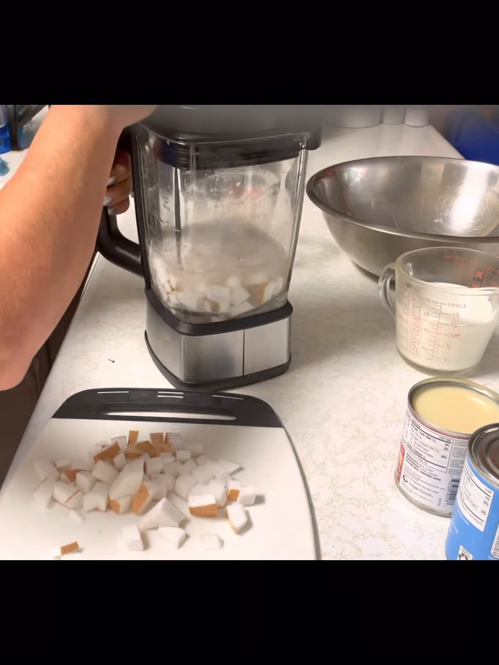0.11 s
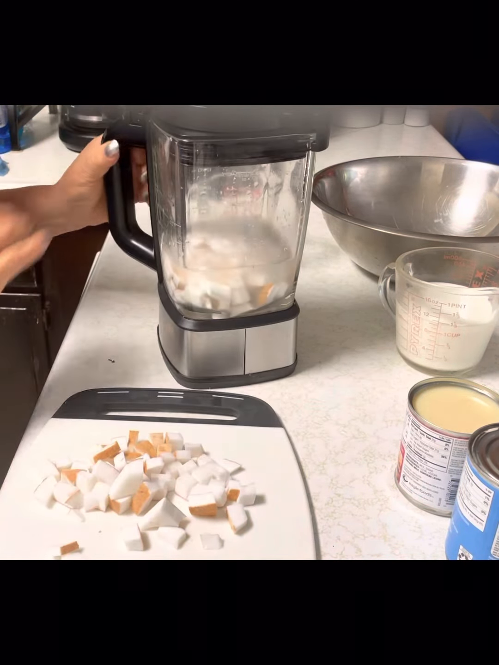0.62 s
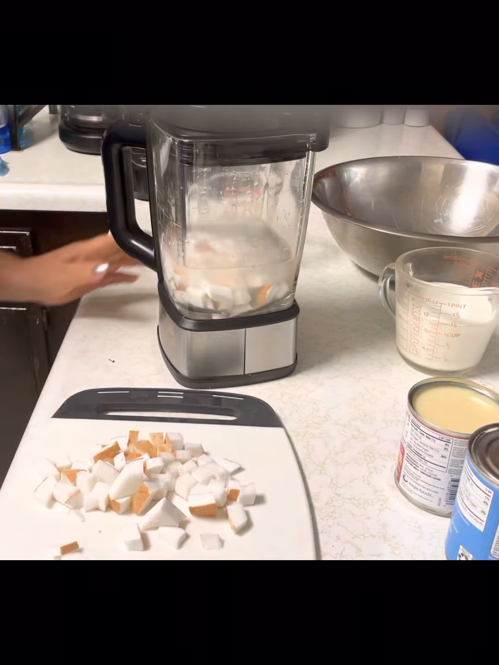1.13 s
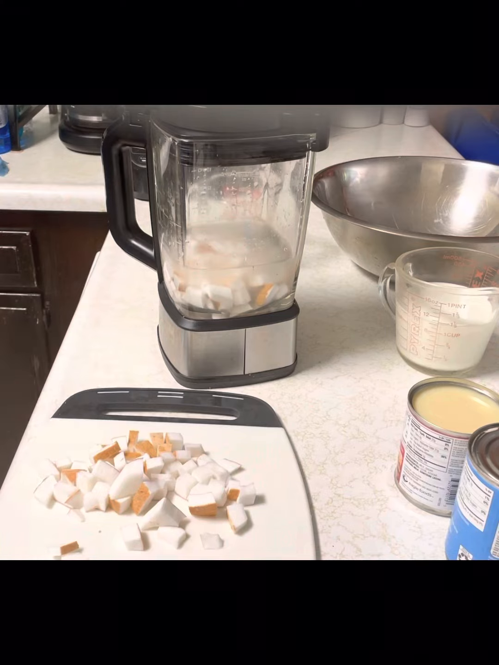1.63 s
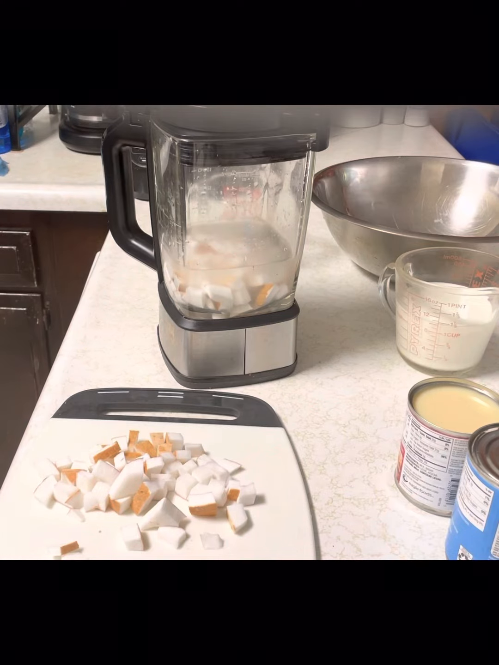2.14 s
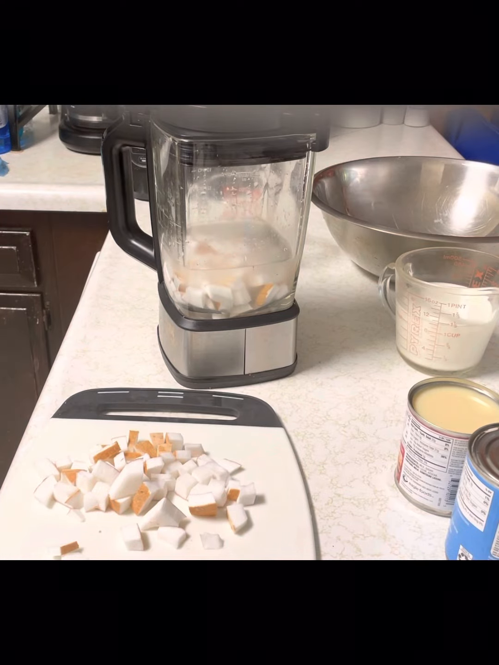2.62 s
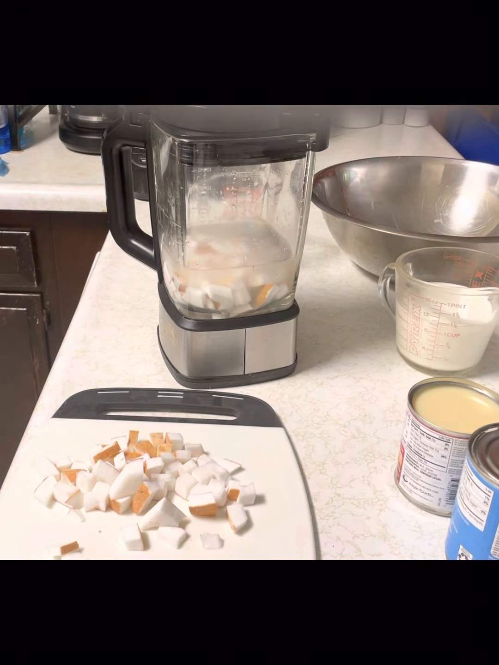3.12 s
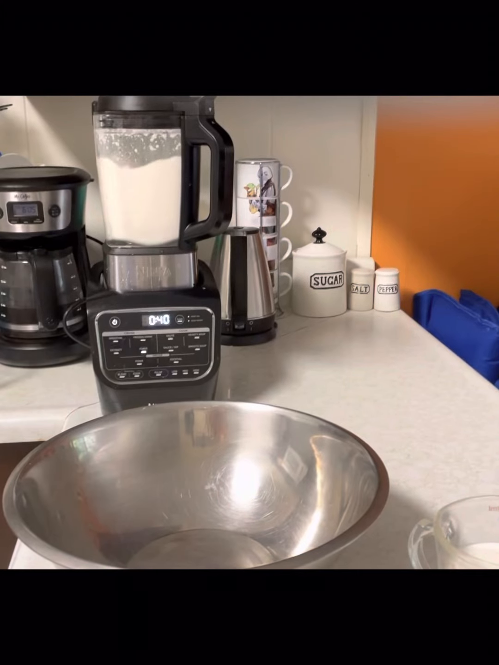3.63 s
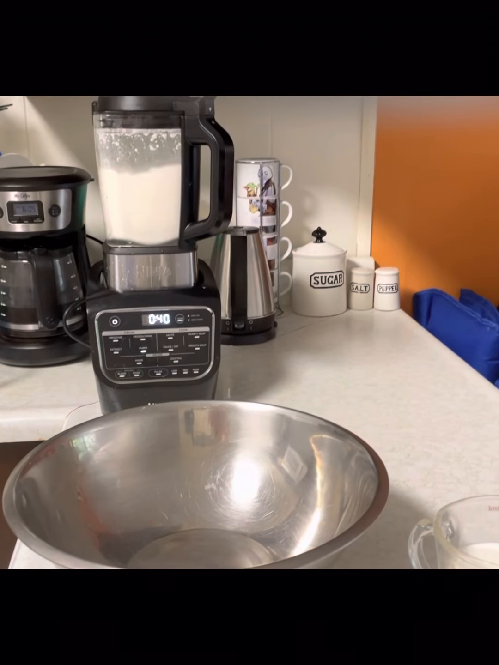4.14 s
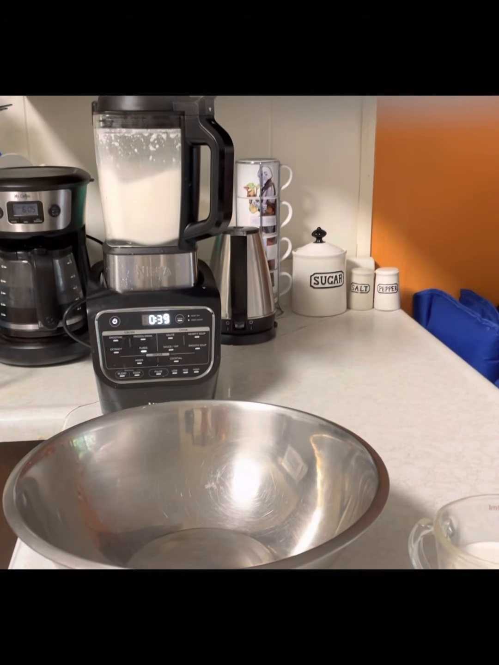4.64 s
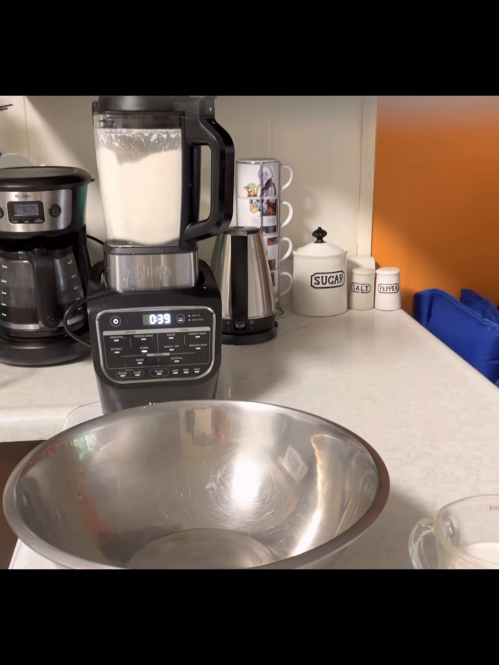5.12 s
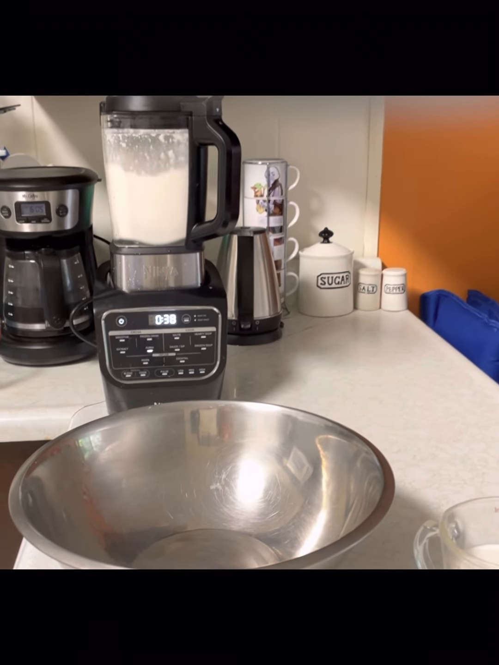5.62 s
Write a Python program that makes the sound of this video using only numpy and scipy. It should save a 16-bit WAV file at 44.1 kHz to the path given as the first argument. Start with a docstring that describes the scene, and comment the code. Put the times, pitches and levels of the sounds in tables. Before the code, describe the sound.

A jar is set on a kitchen counter with a thump, light knocks and creaks follow, then a loud blender abruptly cuts in and runs steadily.

```python
"""A quiet kitchen: a hand knocks, brushes, raps and ticks a blender jar on the counter; its lid creaks.
Knocks ring damped modes, brushing and rattly tails are banded noise, over a low rumble and mains hum.
After an instant of silence the scene cuts to the blender already running: wavering shaft orders and throb.
Chopped food churns as noise that rings the jar, under a bright hiss; falling food makes the shaft sag.
Two microphone ports hear it all, the knocks, ticks and squeak with echoes of a small hard room."""
import sys
import numpy as np
from scipy import signal
from scipy.fft import rfft, irfft
from scipy.io import wavfile
from scipy.ndimage import uniform_filter1d

SR = 44100
rng = np.random.default_rng(int(sys.argv[2]) if len(sys.argv) > 2 else 0)


def output_pcm(signal):
    """Save a mono or channel-first signal as 16-bit PCM at the path in sys.argv[1].

    Samples are clipped to [-1, 1] before scaling.
    """
    pcm = np.clip(np.atleast_2d(signal).T, -1, 1) * 32767
    wavfile.write(sys.argv[1], SR, np.round(pcm).astype(np.int16))


def volts_from_decibels(level):
    """Turn decibel levels (scalar or array-like) into linear amplitude factors."""
    exponent = np.asarray(level, float) / 20
    return 10 ** exponent


N = 254016

# Wavering, roughened motor lines: (shaft multiple, mains-throb multiple, level [dB rms], waver [dB])
MOTOR_ORDERS = [(1, 0, -25, 2.5), (3, 0, -27.5, 1.5), (5, 0, -34.5, 3.5), (6, 0, -46.5, 6.5),
                (7, 0, -41, 5.5), (12, 0, -38.5, 2), (0, 1, -37, -3.5), (0, 2, -29, 3.5), (1, -1, -44, 3),
                (1, 1, -32.5, 0), (3, -1, -41, 6), (4, 1, -28, -0.5)]
# The whirl of food falls back on the blades: (time [s], churn swell [dB], shaft slowing [turns/s])
GULPS = [(3.432, 2, 3.98), (3.859, 2, 5.9), (4.181, 1, 4.97), (4.452, 2.5, 6.9), (4.71, 2.5, 7.2),
         (5.048, 2.5, 7.956), (5.302, 2, 8.5), (5.591, 3.5, 8.75)]
# Relative colour of the churning food: (frequency [Hz], density [dB per Hz])
CHURN_COLOUR = [(18, -52), (30, -44), (127, -24.5), (175, -6), (379, -11.5), (530, -2), (589, -9),
                (824, -2), (995, -18), (1200, -12), (1480, -15), (2160, -17), (4500, -30), (5850, -31),
                (9900, -120)]
# Jar and base ringing under the churn: (frequency [Hz], width [Hz], gain over the churn [dB])
JAR_MODES = [(85.6, 10, 20), (260, 130, 6.5), (345.8, 5.9, 14.5), (448, 42, 6), (530, 87, -9),
             (800, 290, 2.5), (886, 25, 1.5), (1200, 50, 5), (1649, 20.5, 10.5), (2230, 30, 6),
             (2170, 60, 1.5), (2686, 310, 4.5)]
# Relative colour of cooling air and fine spray: (frequency [Hz], density [dB per Hz])
HISS_COLOUR = [(1500, -2), (3500, -23), (5700, -38), (6100, 3), (6600, -4.5), (8500, -4), (10500, -4),
               (12700, -5), (13000, -14), (13300, 3.5), (16000, -16.5)]
# The jar bumps the counter: (time [s], crack [dB], thud [dB], body [dB], pitch the struck spot favours [Hz])
THUMPS = [(0.0004, -24, -20.5, -17.5, 248), (1.234, -75, -49.5, -41.5, 160), (1.5693, -67, -55, -51, 143),
          (2.0538, -56, -66, -48, 293), (2.0664, -58, -46, -37.5, 165), (2.1457, -70, -48, -40, 143),
          (2.251, -32, -34, -16.5, 307), (2.621, -68, -56, -50.5, 199)]
# Fingers rap the plastic: (time [s], crack [dB], plastic [dB], body [dB], pitch the struck spot favours [Hz])
RAPS = [(1.6857, -54, -54, -47, 143), (2.2175, -50, -42, -42, 218), (2.2455, -36, -36, -32, 303)]
# The lid creaks in runs of slips: (start [s], slips [count], first gap [s], growth of each gap [s])
CREAKS = [(2.7255, 3, .0205, -.005), (2.8417, 5, .0145, .003), (2.9766, 3, .0217, 0)]
# Loudness of each creak run: (first plastic [dB], body [dB], rise per slip [dB])
CREAK_LEVELS = [(-49, -39, -3), (-41.5, -41.5, 1.5), (-40.5, -39, 1)]
# Modes of counter, jar and lid:
# (frequency [Hz], level [dB], t60 [s], struck by [0 crack, 1 thud, 2 body, 3 plastic])
BODY_MODES = [(80, 0, .3, 1), (58, -6, .3, 1), (160, 0, .1, 2), (225, -2, .08, 2), (330, 0, .06, 2),
              (480, -4, .04, 2), (1150, -8, .02, 0), (1500, -6, .02, 0), (660, -2, .04, 3),
              (760, 0, .04, 3), (890, -1, .035, 3)]
# Rise time of the modes struck by each part: (crack [s], thud [s], body [s], plastic [s])
MODE_RISE = [.001, .008, .003, .0015]
# Relative colour of the crack that opens a blow: (frequency [Hz], density [dB per Hz])
CRACK_COLOUR = [(900, 10), (2300, -4), (3500, -27), (5500, -6), (9000, -11.5), (12000, -40), (16000, -54)]
# Fingernail ticks: (time [s], level [dB], centre [Hz])
TICKS = [(.357, -65, 9000), (.407, -65, 3000), (.566, -60, 2500), (.634, -61, 3200), (.9602, -64, 2600),
         (1.2894, -52, 1800), (1.596, -51, 10000), (1.6857, -50, 1900), (2.2165, -49, 4500),
         (2.244, -32, 4500)]
# A fingertip on plastic: (time [s], length [s], pitch [Hz], level [dB])
SQUEAK = (.608, .06, 1330, -72)
# Brushing strokes and the rattly tails of knocks, one row each:
# (start [s], hold [s], dull [dB], mid [dB], bright [dB])
BRUSHES_AND_RATTLES = [(0.0, 0.027, -47, -46, -47.5), (0.607, 0.15, -81, -84, -92),
                       (.715, 0.044, -71.5, -76, -76), (0.762, 0.056, -73, -64.5, -64.5),
                       (0.864, 0.026, -70, -65, -62.5), (0.955, 0.074, -89, -65, -73),
                       (1.238, 0.064, -72, -71, -70), (1.467, 0.11, -85, -81, -72.5),
                       (1.597, 0.018, -86, -90, -69), (1.685, 0.019, -53, -75, -82),
                       (1.762, .05, -74, -71, -83), (2.059, 0.13, -66, -74, -68.5),
                       (2.244, 0.029, -43, -53, -49.5), (2.62, 0.066, -73, -70.5, -69),
                       (2.744, 0.075, -60, -74, -87), (2.85, 0.091, -54, -65, -62),
                       (2.983, 0.045, -61, -60.5, -57.5), (3.1, .1, -85, -75, -72.5)]
# Faint stirring between the rows above: (dull [dB], mid [dB], bright [dB])
REST_LEVELS = (-77, -82, -106)
# Dull, mid and bright bands of brushing and rattle: (centre [Hz], width [octaves])
BRUSH_BANDS = [(450, 1.67), (2400, 0.63), (8500, 0.76)]
# Jar wall ringing under brushing and rattle: (frequency [Hz], width [Hz], gain [dB])
JAR_WALL = [(2100, 170, 3.5), (2520, 88, 6), (3420, 160, 3.5), (4660, 200, 8.5)]
# Relative colour of the room's rumble and faint hiss: (frequency [Hz], density [dB per Hz])
FLOOR_COLOUR = [(15, -55), (25, -2), (121, -5), (213, -17), (301, -19), (604, -44), (2130, -30),
                (2370, -47), (6370, -40), (7890, -37), (10900, -34.5), (15000, -39)]
# Two microphone ports: (frequency [Hz], likeness [0-1], left leads by [radians], left over right [dB])
PORTS = [(60, .97, .1, .5), (200, .97, .3, .5), (430, .75, .5, 2.5), (600, .65, .7, 0), (700, .85, 1.6, -2),
         (900, .92, 1.7, -1), (1080, .45, .3, 1), (1400, .5, .4, 1), (1700, .8, .3, -1),
         (2700, .8, -.4, -2.5), (4100, .4, 0, -3.5), (6800, .3, 0, -1), (8100, .9, 3, 0),
         (8900, .9, 3.3, 0), (10300, .9, 6.1, 0), (11800, .9, 6.5, 0), (12500, .95, 9.3, 0),
         (14000, .95, 9.6, 0), (14800, .9, 12.4, 0)]
# Decay of the room's echoes: (frequency [Hz], t60 [s])
ROOM_DECAY = [(100, 0.53), (300, 0.33), (800, 0.33), (2000, 0.71), (5000, 0.67), (12000, 0.029)]

THROB_HZ = 120
CUT_IN_S, FADE_IN_S = 3.286, 0.007  # running blender cuts in; its fade-in
HUSH_S = 3.278  # the quiet part has faded to silence
FREE_HZ, COLD_HZ, THINS_S = 185.4, 171.3, 1.2  # the shaft gains speed as the mix thins
GULP_S, SAG_LAG_S, SAG_S = 0.056, 0.0401, .06  # width of the swell; delay and width of the slowing
CHURN_DB, CHURN_FADE_DB_PER_S = -17, 0.84
HISS_DB, HISS_FOLLOWS = -35.5, 0.41  # the treble follows this share of the churn's swings
THUMP_PLASTIC_DB = -14  # under the body
LIGHT_THUD_DB = -11  # raps and slips barely move the counter: thud under the body
SLIP_CRACK_DB, SLIP_SPOT_HZ, SLIP_SCATTER_DB = -10, 300, 1.5  # crack under the plastic; spread of the body
TICK_S, TICK_OCTAVES = .0012, .55  # decay; width of its band
BRUSH_RISE_DB_PER_S, BRUSH_FALL_DB_PER_S = 1400, 190
FLOOR_DB, HUM_DB = -64, -64.5


def evened(x):
    """Scales to rms 1."""
    return x / np.sqrt(np.mean(x ** 2) + 1e-20)


def read(hz, points):
    """Reads every column of a table along log frequency."""
    f, *columns = np.transpose(points)
    return [np.interp(np.log(hz + 1), np.log(f + 1), c) for c in columns]


def drift(count, per_s):
    """Slow random curves of rms 1, each a sum of sines up to per_s cycles a second."""
    t = np.arange(N) / SR
    rates = np.geomspace(per_s / 8, per_s, num=12)
    curves = []
    for phases in rng.random((count, len(rates))):
        curves.append(evened(sum(np.sin(2 * np.pi * (f * t + p)) for f, p in zip(rates, phases))))
    return curves


def unit(magnitude):
    """A spectrum scaled so that its noise has rms near 1."""
    return magnitude / np.sqrt(np.mean(magnitude ** 2)) * np.sqrt(2 * len(magnitude))


def ringing(hz, modes):
    """Gain of a set of resonances over a flat base."""
    return 1 + sum((volts_from_decibels(db) - 1) / (1 + (2 * (hz - f) / width) ** 2) for f, width, db in modes)


def port_pair(hz):
    """Likeness of the two ports at hz, and the complex gain of each."""
    same, lead, lr_db = read(hz, PORTS)
    left = volts_from_decibels(lr_db / 2) * np.exp(.5j * lead)
    return np.clip(same, 0, 1), left, 1 / left


def noise(shape, size, patchy_db, flicker_db, same_share):
    """Two-port noise; shape(hz, t) is its magnitude, roughened by patches and wide flicker."""
    hop = size // 4
    frames, hz = N // hop + 5, np.fft.rfftfreq(size, 1 / SR)
    a, b, c, d, patches = rng.standard_normal((frames, len(hz), 5)).T
    patches = uniform_filter1d(patches, size // 64, 0)
    patches = evened(uniform_filter1d(patches, 3000 // hop, 1))
    flicker = evened(uniform_filter1d(rng.standard_normal(frames), size=3))
    same, left, right = (v[:, None] for v in port_pair(hz))
    same = same * np.clip(same_share, 0, 1)
    first = a + 1j * b
    second = same * first + np.sqrt(1 - same ** 2) * (c + 1j * d)
    z = np.array([left * first, right * second])
    z *= shape(hz[:, None], (np.arange(frames) * hop / SR)[None])
    z *= volts_from_decibels(patchy_db * patches + flicker_db * flicker)
    sound = signal.istft(z, nperseg=size, noverlap=size - hop)[1][:, :N]
    return sound / (size * np.sqrt(8 / 3) / 2)


def motor(t):
    """Shaft speed, churn level and its swing: each gulp of food swells the churn, then slows the shaft."""
    shaft_hz = FREE_HZ - (FREE_HZ - COLD_HZ) * np.exp(-np.maximum(t - CUT_IN_S, 0) / THINS_S)
    swing_db = -CHURN_FADE_DB_PER_S * (t - CUT_IN_S)
    for s, db, sag_hz in GULPS:
        swing_db = swing_db + db * np.exp(-((t - s) / GULP_S) ** 2)
        shaft_hz = shaft_hz - sag_hz * np.exp(-((t - s - SAG_LAG_S) / SAG_S) ** 2)
    return shaft_hz, CHURN_DB + swing_db, swing_db


def motor_lines():
    """Shaft orders, mains throb and their sum and difference tones, each wavering on its own."""
    t = np.arange(N) / SR
    shaft_hz, _, swing_db = motor(t)
    turns = np.cumsum(shaft_hz * (1 + 0.0016 * drift(count=1, per_s=32)[0])) / SR
    surge_db = .5 * swing_db
    out = np.zeros((2, N))
    wobbles = drift(count=len(MOTOR_ORDERS), per_s=20)
    shakes = drift(count=len(MOTOR_ORDERS), per_s=16)
    for (k, m, db, waver_db), wobble, shake in zip(MOTOR_ORDERS, wobbles, shakes):
        k, m = round(k), round(m)
        _, left, right = port_pair(k * shaft_hz.mean() + m * THROB_HZ)
        cycles = k * turns + m * THROB_HZ * t + rng.random()
        tone = volts_from_decibels(db + waver_db * wobble + surge_db) * np.exp(2j * np.pi * cycles)
        tone *= np.exp(1j * .35 * shake * (k > 0))  # the shaking jar blurs the phase of shaft tones
        out += np.sqrt(2) * np.real([left * tone, right * tone])
    return out


def churn():
    """Food thrown against the jar: dense noise that rings the jar and base."""
    def shape(hz, t):
        colour = volts_from_decibels(read(hz, CHURN_COLOUR)[0]) * ringing(hz, JAR_MODES)
        return unit(colour) * volts_from_decibels(motor(t)[1])
    return noise(shape, size=2048, patchy_db=1.0, flicker_db=0.5, same_share=0.94)


def hiss():
    """Cooling air and fine spray: bright, nearly smooth noise that partly follows the churn."""
    def shape(hz, t):
        return unit(volts_from_decibels(read(hz, HISS_COLOUR)[0])) * volts_from_decibels(HISS_DB + HISS_FOLLOWS * motor(t)[2])
    return noise(shape, size=512, patchy_db=1.2, flicker_db=0.3, same_share=0.89)


def blows():
    """Thumps, raps and creak slips as rows: (time [s], crack, thud, body, plastic [dB], spot [Hz])."""
    rows = [(s, crack, thud, body, body + THUMP_PLASTIC_DB, hz) for s, crack, thud, body, hz in THUMPS]
    rows += [(s, crack, body + LIGHT_THUD_DB, body, plastic, hz) for s, crack, plastic, body, hz in RAPS]
    for (start, slips, gap, longer), (first_db, body, louder_db) in zip(CREAKS, CREAK_LEVELS):
        for k in range(round(slips)):
            plastic = first_db + louder_db * k
            ring = body + SLIP_SCATTER_DB * rng.standard_normal()
            s = start + k * gap + longer * k * (k - 1) / 2
            rows.append((s, plastic + SLIP_CRACK_DB, ring + LIGHT_THUD_DB, ring, plastic, SLIP_SPOT_HZ))
    return rows


def knocks():
    """Each blow is a short crack with a scratchy puff; damped modes of the body swell after it."""
    out, t = np.zeros(N), np.arange(SR // 2) / SR
    colour = volts_from_decibels(read(np.fft.rfftfreq(len(t), 1 / SR), CRACK_COLOUR)[0])
    burst = np.exp(-t / .001) + .2 * np.exp(-t / .014)  # crack, then puff
    rows = blows()
    for (s, *blow_db, spot_hz), draw in zip(rows, rng.standard_normal((len(rows), len(t)))):
        sound = volts_from_decibels(blow_db[0]) * evened(irfft(rfft(draw) * colour, len(t))) * burst
        chances = draw.reshape(2, -1).T[-len(BODY_MODES):]  # each mode's scatter in pitch and level
        for (hz, db, t60, part), (pitch_chance, level_chance) in zip(BODY_MODES, chances):
            part = round(part)
            detuned_hz = hz * (1 + 0.062 * pitch_chance)
            swell = (1 - np.exp(-t / MODE_RISE[part])) ** 2
            spot_db = -9 * abs(np.log2(hz / spot_hz)) * (part == 2)  # body modes far from the spot stay quiet
            level_db = blow_db[part] + db + spot_db + 0.78 * level_chance - 60 * t / t60
            sound += volts_from_decibels(level_db) * swell * np.sin(2 * np.pi * detuned_hz * t)
        place = out[round(max(s, 0) * SR):][:len(t)]
        place += sound[:len(place)]
    return out


def ticks():
    """Fingernail ticks: tiny decaying noise clicks, each coloured around its own pitch."""
    out, t = np.zeros(N), np.arange(2048) / SR
    hz = np.fft.rfftfreq(len(t), 1 / SR)
    for (s, db, mid_hz), draw in zip(TICKS, rng.standard_normal((len(TICKS), len(t)))):
        band = np.exp(-(np.log2(hz / mid_hz + 1e-9) / TICK_OCTAVES) ** 2)
        click = evened(irfft(rfft(draw) * band)) * np.exp(-t / TICK_S)
        out[round(s * SR):][:len(t)] += volts_from_decibels(db) * click
    return out


def squeak():
    """A fingertip on plastic: one faint whistle of wavering pitch."""
    s, length, hz, db = SQUEAK
    t = np.arange(N) / SR
    bend = np.cumsum(1 + 0.016 * drift(count=1, per_s=37)[0]) / SR
    arch = np.sin(np.pi * np.clip((t - s) / length, 0, 1))
    return volts_from_decibels(db) * np.sin(2 * np.pi * hz * bend) * np.sqrt(np.clip(arch, 0, 1))


def brushing_and_rattles():
    """Brushing and rattly knock tails: three patchy noise bands, ringing the jar wall."""
    def shape(hz, t):
        bands = []
        for f, octaves in BRUSH_BANDS:
            band = np.exp(-(np.log2(hz / f + 1e-9) / octaves) ** 2)
            bands.append(unit(band * ringing(hz, JAR_WALL)))
        power = volts_from_decibels(np.array(REST_LEVELS))[:, None, None] ** 2 * np.ones(t.shape)
        for s, hold, *db in BRUSHES_AND_RATTLES:
            rise_db = BRUSH_RISE_DB_PER_S * np.maximum(s - t, 0)
            fall_db = BRUSH_FALL_DB_PER_S * np.maximum(t - s - hold, 0)
            power = power + volts_from_decibels(np.array(db)[:, None, None] - rise_db - fall_db) ** 2
        return sum(b * np.sqrt(p) for b, p in zip(bands, power))
    return noise(shape, size=512, patchy_db=3, flicker_db=2, same_share=.9)


def room_tone():
    """Low rumble and faint hiss as flickering noise, with a mains hum of wavering level."""
    def shape(hz, t):
        return unit(volts_from_decibels(read(hz, FLOOR_COLOUR)[0])) * volts_from_decibels(FLOOR_DB)
    hum_level = volts_from_decibels(HUM_DB + 1.2 * drift(count=1, per_s=8.1)[0])
    hum = np.sin(2 * np.pi * THROB_HZ * np.arange(N) / SR) * hum_level
    return hum + noise(shape, size=1024, patchy_db=1.0, flicker_db=4.0, same_share=0.77)


def kitchen(x, wet_db):
    """Direct sound at both ports, plus sparse echoes that die band by band."""
    _, left, right = port_pair(np.fft.rfftfreq(N, 1 / SR))
    direct = irfft(rfft(x) * np.array([left, right]), N)
    at = np.arange(350, SR // 2, 20)  # one echo in every 20 samples
    taps = np.zeros((2, SR // 2 + 20))
    places = at + rng.integers(0, 20, (2, len(at)))
    np.put_along_axis(taps, places, rng.choice([-1., 1.], (2, len(at))), 1)
    hz, t, z = signal.stft(taps, SR, nperseg=256)
    z[1] = np.where(hz[:, None] < 300, z[0], z[1])  # long waves reach both ports alike
    decay = volts_from_decibels(-60 * t / read(hz, ROOM_DECAY)[0][:, None])
    tail = signal.istft(z * decay, SR, nperseg=256)[1]
    echoes = signal.fftconvolve(x[None], tail / np.linalg.norm(tail[0]), axes=1)[:, :N]
    return direct + volts_from_decibels(wet_db) * echoes


def scene():
    """Quiet handling, an instant of silence, then a cut to the running blender."""
    t = np.arange(N) / SR
    before = np.clip((HUSH_S - t) / 0.012, 0, 1)
    running = np.clip((t - CUT_IN_S) / FADE_IN_S, 0, 1)
    struck = kitchen(knocks() + ticks() + squeak(), wet_db=-13)
    quiet = room_tone() + brushing_and_rattles() + struck
    blender = motor_lines() + churn() + hiss()
    return before * quiet + running * blender


def band_limit(x):
    """A steep low-pass at the top of the band."""
    return signal.sosfilt(signal.butter(12, 16390, fs=SR, output="sos"), x)


def record(dry):
    """Passes on the finished two-port mix."""
    return band_limit(dry)


dry = scene()
out = record(dry)
output_pcm(out)
```